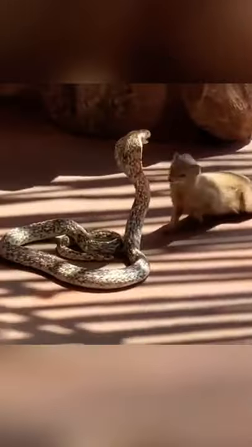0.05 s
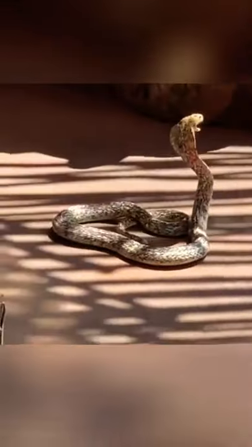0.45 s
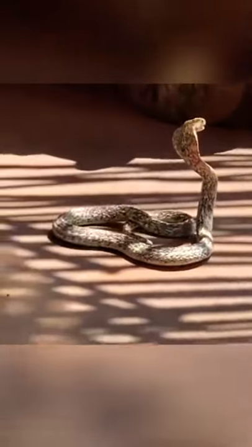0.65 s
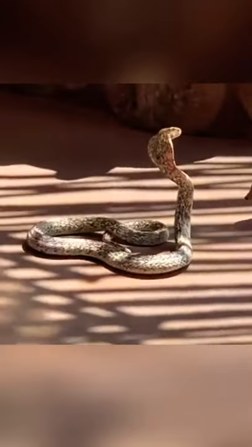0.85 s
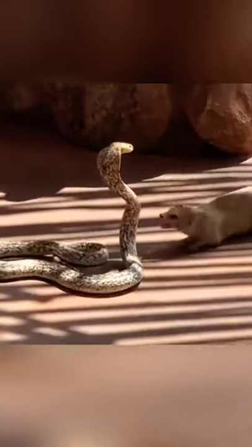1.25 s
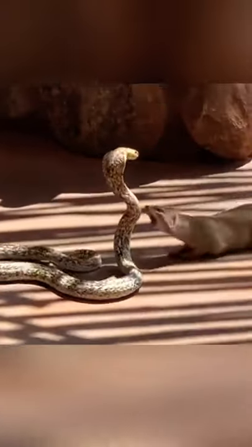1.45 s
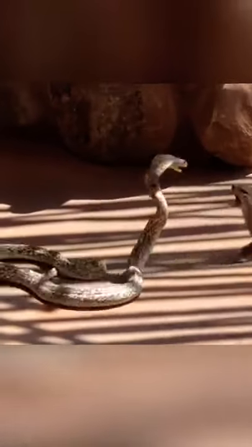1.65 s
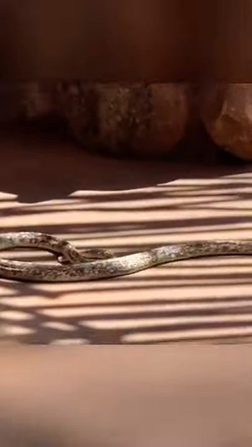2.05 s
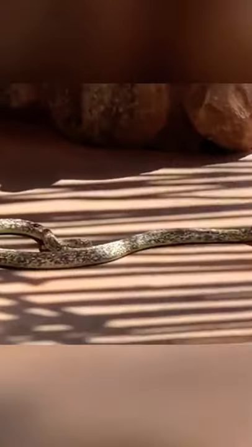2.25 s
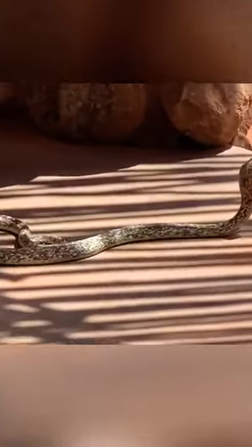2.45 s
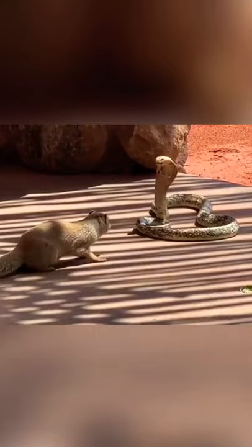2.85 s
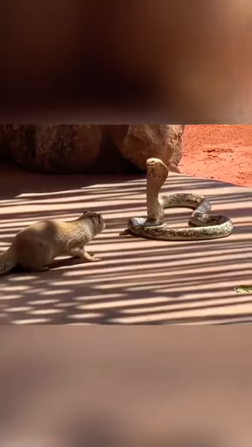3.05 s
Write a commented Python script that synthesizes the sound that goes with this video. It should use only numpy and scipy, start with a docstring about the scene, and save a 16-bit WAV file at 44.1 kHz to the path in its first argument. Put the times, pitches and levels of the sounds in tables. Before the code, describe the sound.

A snake gives one long, airy hiss, then its scales rasp over paving in short slides. Thin falling bird whistles ring out partway through, while wind buffets the microphone and insects shrill faintly far away.

```python
"""Cobra and mongoose on sunlit paving

The cobra forces air through its glottis in one long hiss, then lunges; its scales rasp over the ground.
Thin falling whistles, probably a bird's, ring off the rocks and insects shrill far away.
Wind buffets the microphone until its sound cuts off with a click."""
import sys
import numpy as np
from scipy import signal
from scipy.fft import rfft, irfft
from scipy.io import wavfile

SR = 44100
rng = np.random.default_rng(int(sys.argv[2]) if len(sys.argv) > 2 else 0)


def log_audio(samples):
    """Write samples as a 16-bit WAV file to the path given in sys.argv[1]."""
    # one column per channel
    frames = np.atleast_2d(samples).T
    # limit to full scale, then quantise
    limited = np.clip(frames, -1, 1)
    pcm = np.round(limited * 32767).astype(np.int16)
    wavfile.write(sys.argv[1], SR, pcm)


N = 136710
T = np.arange(N) / SR
WIND_CENTRED_S, CUT_S = 0.739, 2.949

# crisp top of hiss and scales: (frequency [Hz], density [dB])
SIZZLE_SPECTRUM = [(6500, -29), (9500, 19.5), (11500, 7), (13500, 19), (14800, -1)]


def hiss():
    """Turbulent air pulses from the glottis; a sinking mouth resonance joins late."""
    # force of the breath: (time [s], level [dB])
    breath = [(0, -61.5), (.036, -70.5), (.045, -54), (.09, -57), (.15, -54), (.235, -51), (.40, -56.5),
              (.48, -49), (.6, -54.5), (.75, -54), (.86, -55.5), (.95, -57), (1.0, -69.5), (1.03, -76)]
    # glottal turbulence: (frequency [Hz], density [dB])
    air_spectrum = [(400, -18), (900, -13.5), (1600, -10), (2400, -7), (3400, 6.5), (4700, 8.5),
                    (6300, 1.5), (8200, -2.5), (10000, -3.5), (13500, -21.5), (15000, -31)]
    # mouth resonance: (time [s], level [dB])
    mouth_levels = [(.2, -70), (.45, -56), (.58, -56), (.68, -51.5), (.77, -52), (.83, -59.5), (.94, -60),
                    (1.0, -74)]
    pulse_db, flutter_db, sizzle_db = 2.2, 2, -15.5
    mouth_hz, fall_hz_per_s = 8180, 870
    pulse = amp(pulse_db * np.sin(jittered_phase(hz=35, jitter=0.155, rate_hz=13)))
    force = amp(curve(breath)[0] + flutter_db * drift(67))
    rush = force * (noise(air_spectrum) + amp(sizzle_db) * noise(SIZZLE_SPECTRUM))
    mouth_gain = amp(curve(mouth_levels)[0]) * (T < mouth_levels[-1][0])
    mouth = mouth_gain * resonance(mouth_hz - fall_hz_per_s * T, width_hz=1530)
    return amp(-2) * widen(reflections(pulse * (rush + mouth)), side_db=1.5)


def scale_rasp():
    """Scales slide over paving; grit makes the friction noise grainy."""
    # body slides: (start [s], length [s], level [dB], sizzle re rasp [dB])
    slides = [(0.07, 0.1, -62, -2), (0.205, 0.14, -58, -5), (0.302, 0.17, -58.5, -13),
              (0.493, .17, -71, -1), (1.03, 0.064, -63.5, -25), (1.141, 0.088, -58.5, -1),
              (1.184, .11, -62, -2), (1.293, 0.075, -58.5, -5), (1.319, 0.24, -62.5, -7.5),
              (1.497, 0.25, -62.5, -6.5), (1.704, 0.057, -55.5, -4.5), (1.722, 0.12, -60.5, -1.5),
              (1.822, 0.22, -63.5, 5.5), (1.986, 0.21, -80, 7), (2.173, 0.076, -72.5, 2),
              (2.247, 0.07, -63.5, 1), (2.678, 0.045, -64, -23)]
    # scale friction: (frequency [Hz], density [dB])
    spectrum = [(600, -19), (1500, 0), (2500, 1), (3800, 10), (7000, 9.5), (9500, 3), (12000, -6.5),
                (15000, -39)]
    grain_db, grain_hz = 3, 44
    rub_power = sum((amp(db) * swell(s, length)) ** 2 for s, length, db, _ in slides)
    sizzle_power = sum((amp(db + top_db) * swell(s, length)) ** 2 for s, length, db, top_db in slides)
    friction = np.sqrt(rub_power) * noise(spectrum) + np.sqrt(sizzle_power) * noise(SIZZLE_SPECTRUM)
    return reflections(friction * unit(amp(grain_db * drift(grain_hz))))


def scuffs():
    """Soft, dull knocks on the paving, each with its own level and brightness."""
    # contacts: (time [s], level [dB], low-pass [Hz])
    contacts = [(0.332, -59.5, 1500), (.388, -56.5, 1800), (1.776, -51, 3000), (1.922, -60, 5000),
                (2.15, -55, 1200)]
    # contact noise: (frequency [Hz], density [dB])
    spectrum = [(300, 5), (600, 0), (900, 4), (1400, -1.5), (2000, 4), (3000, -20), (6000, -25)]
    out = 0
    for s, db, top_hz in contacts:
        lowpass = signal.butter(3, top_hz, fs=SR, output="sos")
        dull = unit(signal.sosfilt(lowpass, noise(spectrum)))
        out = out + strike(s, db, attack_s=0.00083, t60_s=0.22) * dull
    return out


def grit_ticks():
    """Grit ticks in short, bright bursts of noise."""
    # ticks: (time [s], level [dB])
    ticks = [(.043, -76), (.3385, -36)]
    # tick noise: (frequency [Hz], density [dB])
    spectrum = [(2000, -14), (5500, -12), (7500, 11), (10000, -4), (13000, 9), (15000, -16)]
    return sum(strike(s, db, attack_s=0.00028, t60_s=0.0098) for s, db in ticks) * noise(spectrum)


def whistles():
    """A long fall that turns raspy as its octave takes over, and short chirps, clean to scratchy."""
    # long whistle: (time [s], pitch [Hz], level [dB], octave re fundamental [dB], jitter [ratio])
    glide = [(1.135, 5845, -59.5, -40, .015), (1.156, 5080, -56.5, -36, 0.0073),
             (1.177, 4178, -52, -34, 0.0074), (1.2, 4083, -60, -28, 0.0222), (1.255, 4035, -57, -26, 0.017),
             (1.282, 3710, -48, -18, 0.039), (1.322, 2867, -56.5, -37, 0.036),
             (1.368, 2571, -50, -16, 0.013), (1.395, 2193, -62.5, -1.5, 0.062),
             (1.432, 1840, -64.5, 9, 0.026), (1.475, 1412, -71.5, 5, 0.044), (1.505, 1275, -78, 18, 0.083)]
    # chirps: (start [s], length [s], from [Hz], to [Hz], level [dB], jitter [ratio])
    chirps = [(.405, 0.09, 6930, 5230, -56, .018), (0.459, 0.069, 5530, 3090, -50, .022),
              (0.493, 0.075, 4210, 3550, -50, .05), (1.038, 0.023, 3560, 3350, -60.5, .08),
              (1.155, 0.022, 5870, 4850, -48, 0.023), (1.173, 0.051, 7580, 3910, -43.5, 0.0087),
              (1.213, 0.032, 7710, 4010, -39.5, 0.0198), (2.618, 0.046, 4570, 3660, -64.5, .09),
              (2.68, 0.025, 4210, 3150, -61, 0.11)]
    jitter_hz, flutter_db, flutter_hz = 450, 2.5, 225
    hz, db, octave_db, jitter = curve(glide)
    phase = jittered_phase(hz, jitter, jitter_hz)
    gate = (T > glide[0][0]) * (T < glide[-1][0])
    tones = amp(db) * (np.sin(phase) + amp(octave_db) * np.sin(2 * phase)) * gate
    for s, length, from_hz, to_hz, db, jitter in chirps:
        hz = from_hz * (to_hz / from_hz) ** ramp(T - s, length)
        tones = tones + amp(db) * swell(s, length) * np.sin(jittered_phase(hz, jitter, jitter_hz))
    flutter = amp(flutter_db * drift(flutter_hz))
    return rock_echo(np.sqrt(2) * tones * flutter)


def wind():
    """Rumble and eddies of a few uneven pressure swings each, until the sound cuts off with a click."""
    # wind between buffets: (time [s], level [dB])
    levels = [(0, -55), (.06, -64), (.3, -60), (.46, -47), (.7, -47.5), (1.0, -49), (1.15, -41),
              (1.26, -34.5), (1.42, -46), (1.52, -47), (1.85, -55.5), (2.15, -48), (2.38, -50),
              (2.48, -45.5), (2.63, -46.5), (2.94, -49.5)]
    # rumble: (frequency [Hz], density [dB])
    rumble_spectrum = [(20, -59), (35, -6.5), (55, 3.5), (90, -6.5), (130, -13), (200, -23.5), (350, -69.5),
                       (800, -60)]
    # eddies on the microphone: (peak time [s], length [s], frequency [Hz], peak [dB])
    eddies = [(0.388, 0.017, 69.4, -39), (0.486, 0.07, 85.86, -34.5), (0.498, 0.056, 170, -43),
              (0.602, 0.035, 100, -37.5), (0.672, 0.096, 156.5, -52.5), (0.658, 0.083, 90, -41.5),
              (0.745, 0.09, 80, -34.5), (0.838, 0.029, 104.5, -29), (0.913, 0.016, 90.6, -27),
              (0.976, 0.047, 109, -34), (1.077, 0.022, 125.2, -35.5), (1.107, 0.024, 131.4, -31),
              (1.234, 0.038, 84.5, -31.5), (1.385, 0.11, 75.3, -40), (1.995, 0.018, 71.7, -29.5),
              (2.125, 0.026, 80.05, -38.5), (2.225, 0.018, 65.1, -35), (2.302, 0.018, 110.8, -38.5),
              (2.581, 0.036, 85, -34.5), (2.731, 0.04, 115, -39), (2.822, 0.021, 70, -28.5),
              (2.879, 0.046, 89, -36), (2.929, 0.023, 112, -29.5)]
    # swirls inside an eddy: (frequency [Hz], density [dB])
    swirl_spectrum = [(80, -13), (170, 9.5), (330, -7), (500, -18), (900, -45)]
    swirl_db, swirl_ref_hz = -17, 98.1
    click_db, click_decay_s = -35, 0.00059
    rumble = amp(curve(levels)[0]) * noise(rumble_spectrum)
    uneven_time_s = np.cumsum(1 + 0.2082 * drift(63, channels=2), axis=1) / SR
    swirl_gain = 0
    for s, length, hz, db in eddies:
        push = amp(db) * np.exp(-np.minimum((2 * (T - s) / length) ** 2, 20))
        rumble = rumble + push * np.sin(2 * np.pi * (hz * uneven_time_s + rng.random((2, 1))))
        swirl_gain = swirl_gain + push * (hz / swirl_ref_hz) ** 3.84   # fast eddies shed more swirls
    width = ramp(WIND_CENTRED_S - T, 0.011)
    gusts = stereo(rumble[0], width * rumble[1]) + amp(swirl_db) * swirl_gain * noise(swirl_spectrum)
    click = amp(click_db) * np.exp(-np.abs(T - CUT_S) / click_decay_s) * (T < CUT_S)
    return gusts * ramp(CUT_S - T, 0.0033) + click


def insects():
    """A distant chorus of narrow, throbbing noise bands."""
    # shrill bands: (centre [Hz], width [Hz], level [dB])
    bands = [(4820, 130, -82), (5470, 23, -70.5), (5565, 84, -78), (5690, 110, -76.5), (6150, 51, -74.5),
             (6020, 860, -73.5)]
    # chorus swell: (time [s], gain [dB])
    gains = [(0, -1), (1, 1.5), (1.7, 1.5), (2.05, 4.5), (2.2, 9), (2.33, 3), (2.75, -0.5), (2.9, 3.5),
             (3.1, 6)]
    throb = 1 + 0.092 * np.sin(jittered_phase(hz=100, jitter=0.195, rate_hz=14.1))
    chorus = sum(amp(db) * resonance(hz, width_hz) for hz, width_hz, db in bands)
    return amp(curve(gains)[0]) * throb * chorus


def outdoors():
    """Steady far noise and a low murmur that comes and goes."""
    # far noise: (frequency [Hz], density [dB])
    air_spectrum = [(30, -1.5), (100, 7), (250, -16), (450, -1), (700, -12.5), (1200, -9), (2500, -14.5),
                    (4500, -52), (8000, -22), (11000, -29.5), (15000, -30)]
    # murmur: (time [s], level [dB])
    murmur_levels = [(0, -61.5), (.4, -60), (.75, -81), (1.6, -69.5), (2.3, -68), (2.93, -83),
                     (2.97, -63.5), (3.1, -63)]
    # murmur: (frequency [Hz], density [dB])
    murmur_spectrum = [(80, 4.5), (180, 3), (290, -0.5), (430, 2), (560, -5), (900, -9), (2000, -33)]
    air = amp(-66.5) * unit(reflections(noise(air_spectrum)))
    return air + amp(curve(murmur_levels)[0]) * noise(murmur_spectrum)


def reflections(x):
    """Early reflections comb the sound differently in each ear."""
    # paths off paving and rock: (left delay [s], right delay [s], gain [dB])
    paths = [(.00071, .00095, -21.5), (.0023, 0.0017, -14), (.0052, 0.005, -6), (0.0113, 0.0075, -3.5)]
    echoes = 0
    for *delays_s, db in paths:
        delayed = [np.interp(T - delay_s, T, ear, left=0) for delay_s, ear in zip(delays_s, x)]
        echoes = echoes + amp(db) * np.array(delayed)
    return x + echoes


def rock_echo(x, direct_db=-2.5, echo_db=-1.5, t60_s=0.19):
    """Direct sound plus a short diffuse echo, different in each ear."""
    t = T[:SR // 2]
    tail = rng.standard_normal((2, len(t))) * np.exp(-np.log(1000) * t / t60_s)
    tail /= np.sqrt(np.sum(tail ** 2, axis=1, keepdims=True))
    return amp(direct_db) * x + amp(echo_db) * signal.fftconvolve(x, tail, axes=1)[:, :N]


def centre_bass(x, below_hz=186):
    """Mono bass during the later gusts."""
    mid, side = (x[0] + x[1]) / 2, (x[0] - x[1]) / 2
    blend = np.clip((T - WIND_CENTRED_S) / 0.019 + 1, 0, 1)
    blend *= np.clip((CUT_S - T) / 0.036 + 1, 0, 1)
    high_side = signal.sosfilt(signal.butter(5, below_hz, "high", fs=SR, output="sos"), side)
    return stereo(mid, side + blend * (high_side - side))


def widen(x, side_db):
    """Raise what differs between the ears."""
    return stereo((x[0] + x[1]) / 2, amp(side_db) * (x[0] - x[1]) / 2)


def stereo(mid, side):
    """Mid and side to left and right."""
    return mid + side * [[1], [-1]]


def amp(db):
    """Decibels to gain."""
    return 10 ** (np.asarray(db) / 20)


def unit(x):
    """Scale to rms 1."""
    return x / np.sqrt(np.mean(x ** 2) + 1e-20)


def curve(rows):
    """Each value column, interpolated over time."""
    s, *columns = np.transpose(rows)
    return [np.interp(T, s, column) for column in columns]


def ramp(elapsed_s, length_s):
    """Linear rise, held within 0 to 1."""
    return np.clip(elapsed_s / length_s, 0, 1)


def swell(start_s, length_s):
    """Half-sine envelope."""
    return np.sin(np.pi * ramp(T - start_s, length_s))


def strike(start_s, db, attack_s, t60_s):
    """Linear attack, exponential decay."""
    return ramp(T - start_s, attack_s) * amp(db - 60 * np.maximum(T - start_s, 0) / t60_s)


def drift(rate_hz, channels=1):
    """Smooth random motion, rms 1."""
    pole = np.exp(-2 * np.pi * rate_hz / SR)
    white = rng.standard_normal((channels, N + SR))
    return unit(signal.lfilter([1], [1, -2 * pole, pole * pole], white)[:, SR:])


def jittered_phase(hz, jitter, rate_hz):
    """Phase [rad] of a tone whose frequency wanders by a share of itself."""
    return 2 * np.pi * np.cumsum(hz * (1 + jitter * drift(rate_hz))) / SR


def noise(spectrum):
    """Shaped stereo noise with a gentle top roll-off, rms 1."""
    hz, db = np.transpose(spectrum)
    bins_hz = np.maximum(np.arange(N // 2 + 1) * SR / N, 1)
    gain = amp(np.interp(np.log(bins_hz), np.log(hz), db)) / (1 + (bins_hz / hz[-1] / 2) ** 2)
    return unit(irfft(rfft(rng.standard_normal((2, N))) * gain, N))


def resonance(hz, width_hz):
    """Stereo noise band whose centre may move, rms 1."""
    phase = 2 * np.pi * np.cumsum(np.broadcast_to(hz, N)) / SR
    in_phase, quadrature = drift(width_hz / 2, channels=2), drift(width_hz / 2, channels=2)
    return unit(in_phase * np.cos(phase) + quadrature * np.sin(phase))


def scene():
    """Snake, whistles, insects and wind over quiet outdoor air."""
    background = outdoors()
    hiss_pan = amp([[-0.6], [0.6]])
    foreground = hiss() * hiss_pan + whistles() + scale_rasp() + scuffs() + grit_ticks()
    return centre_bass(foreground + insects() + wind() + background)


def record(dry):
    """Steep low-pass."""
    cutoff_hz = 14900
    return signal.sosfilt(signal.ellip(10, 0.2, 80, cutoff_hz, fs=SR, output="sos"), dry)


dry = scene()
out = record(dry)
log_audio(out)
```